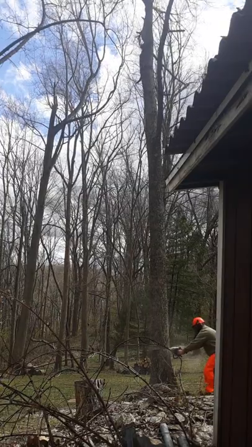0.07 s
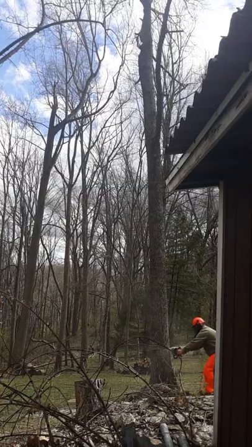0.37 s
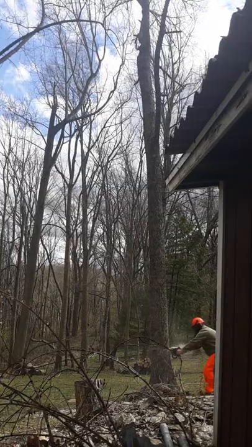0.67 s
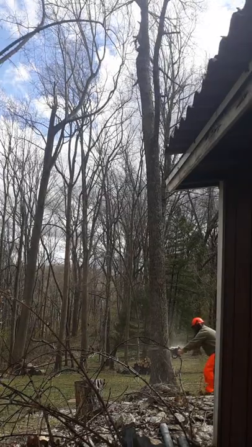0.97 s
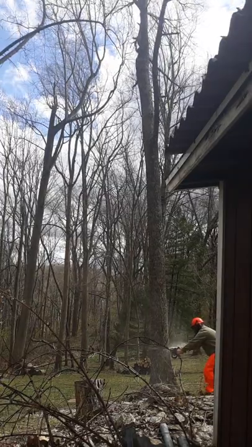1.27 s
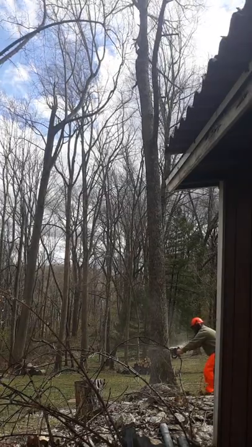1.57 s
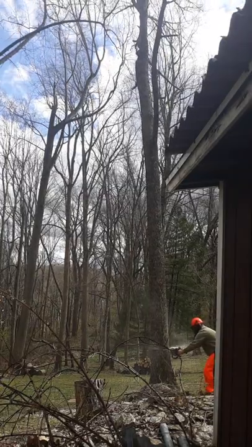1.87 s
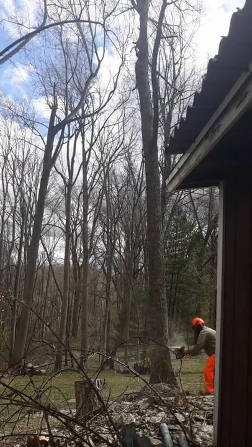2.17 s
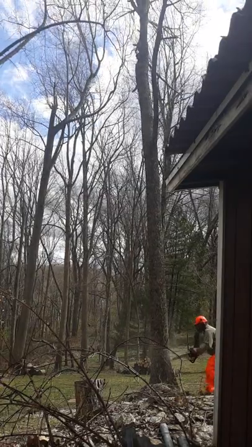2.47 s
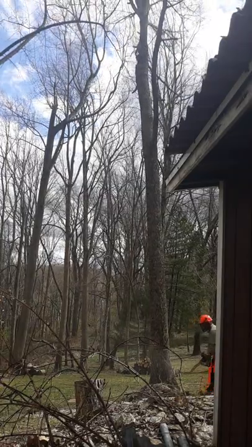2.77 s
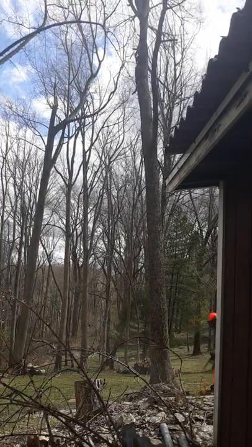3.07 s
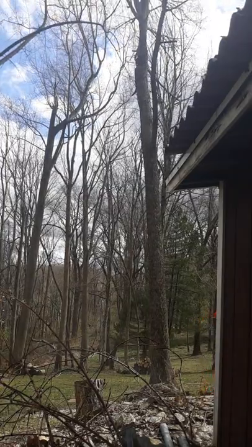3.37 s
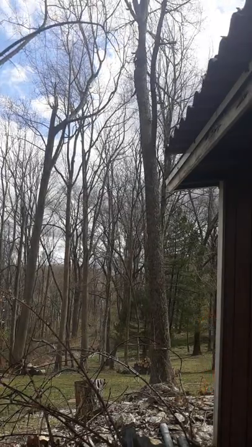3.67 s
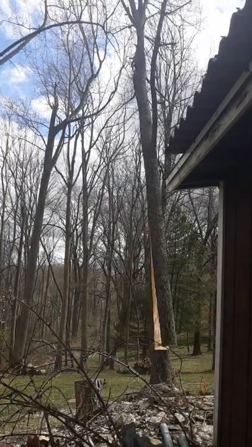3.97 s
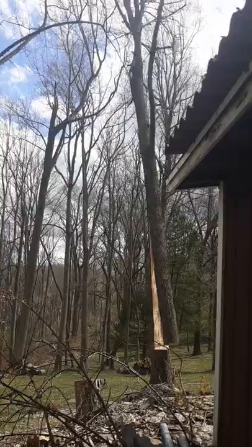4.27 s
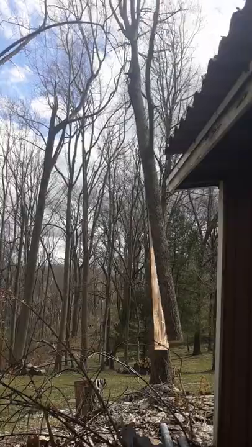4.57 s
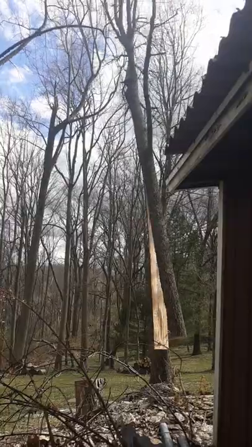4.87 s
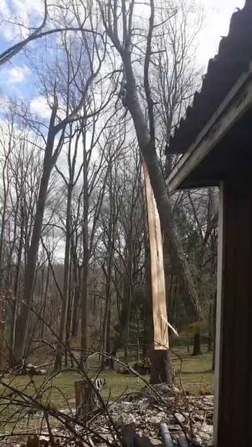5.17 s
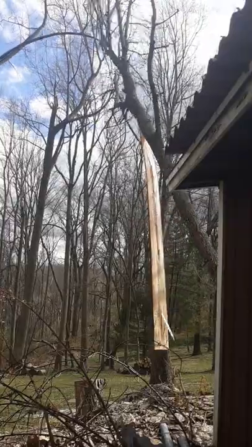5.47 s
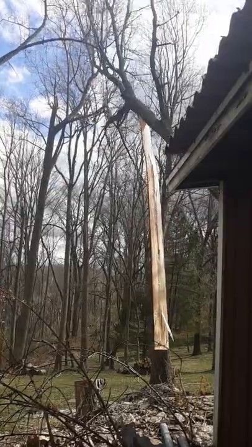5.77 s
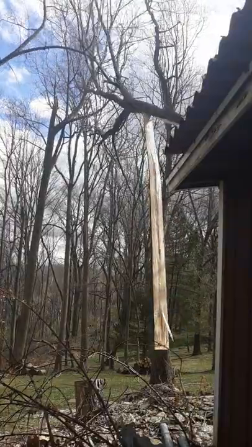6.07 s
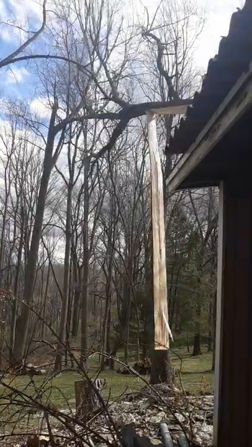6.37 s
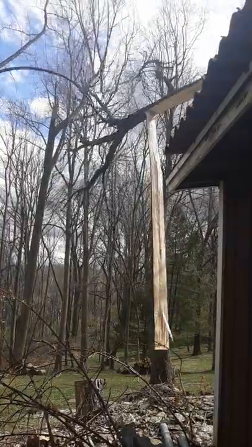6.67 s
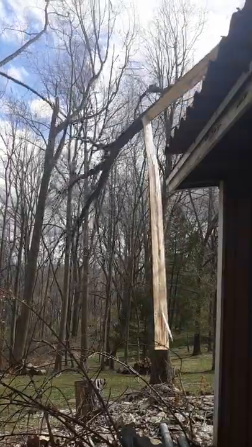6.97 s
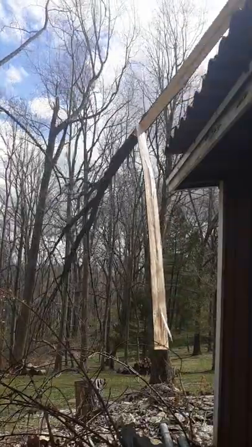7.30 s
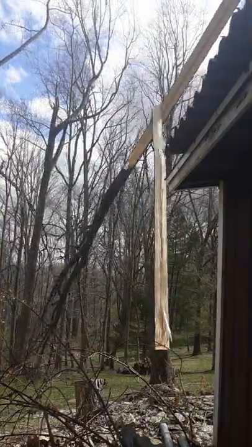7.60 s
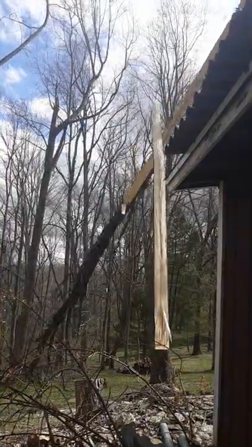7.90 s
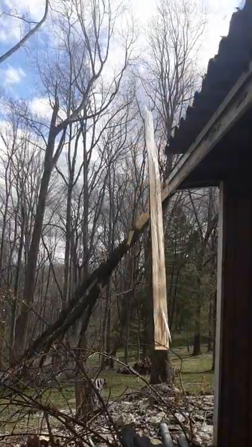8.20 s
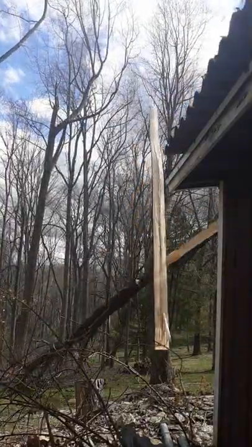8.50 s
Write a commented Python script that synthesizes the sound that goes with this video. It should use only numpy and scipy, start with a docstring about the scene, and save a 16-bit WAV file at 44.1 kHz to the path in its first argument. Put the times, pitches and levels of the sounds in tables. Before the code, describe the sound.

A two-stroke chainsaw labours in a tree trunk, its chain hissing with a few thin squeals. It bogs down, revs up briefly and winds down. The trunk then starts cracking and rips open with a rasping groan. Sharp snaps, dry knocks and creaks follow as the tree tips and crashes through crackling, swishing branches. Everything is heard from some distance, with a short woodland echo over faint air.

```python
"""A tree rips upward with a rasping groan, tearing fibres and loud cracks, creaks as it tips and crashes
through its own branches. Before that, a two-stroke chainsaw labours in the trunk, is pulled out and runs
down: firings pulse the exhaust and ring the muffler, the chain hisses and rubs the bar. Ground and trunks
echo both over faint woodland air. Two microphone ports lie one above the other, so the height of a sound
sets the delay between them."""
import sys
import numpy as np
from scipy import signal
from scipy.fft import rfft, irfft
from scipy.io import wavfile
from scipy.ndimage import map_coordinates

SR = 44100
rng = np.random.default_rng(int(sys.argv[2]) if len(sys.argv) > 2 else 0)


def to_wav(sig):
    """Store sig (one row per channel, or 1-D mono) as 16-bit WAV at the path in sys.argv[1].

    Samples outside -1..1 are clipped; the rate is SR.
    """
    pcm = np.clip(np.atleast_2d(sig), -1, 1) * 32767
    pcm = np.round(pcm).astype(np.int16)
    wavfile.write(sys.argv[1], SR, pcm.T)  # frames by channels


N = 376613
TIME_S = np.arange(N) / SR


def from_db(db):
    """Decibels to gain."""
    return 10 ** (np.asarray(db) / 20)


def unit_rms(x):
    """Scale to unit power."""
    return x / np.sqrt(np.mean(x ** 2) + 1e-20)


def curves(rows):
    """Each column of a timed table at every sample."""
    times_s, *columns = np.transpose(rows)
    return [np.interp(TIME_S, times_s, column) for column in columns]


def drift(knots_per_s):
    """Random wander of unit power."""
    knots = rng.standard_normal(N // 20)
    return unit_rms(np.interp(TIME_S * knots_per_s, np.arange(len(knots)), knots))


def swell(peak_s, attack_s, hold_s, release_s):
    """Gain that grows until peak_s, holds at 1, then dies away."""
    t = TIME_S - peak_s
    log_gain = np.minimum(t, 0) / attack_s - np.maximum(t - hold_s, 0) / release_s
    return np.exp(np.maximum(log_gain, -20))


def add(track, start_s, sound):
    """Mix a sound in at start_s."""
    start = int(start_s * SR)
    track[start:start + len(sound)] += sound[:N - start]


def butter(x, order, edge_hz, kind):
    """Butterworth filter."""
    return signal.sosfilt(signal.butter(order, edge_hz, kind, fs=SR, output="sos"), x)


def colour(x, spectrum, size=4096):
    """Minimum-phase filter from rows of (frequency [Hz], gain [dB])."""
    hz, db = np.transpose(spectrum)
    grid_hz = np.maximum(np.fft.rfftfreq(size, 1 / SR), 1)
    gain = from_db(np.interp(np.log(grid_hz), np.log(hz), db))
    cepstrum = irfft(np.log(gain))
    cepstrum[1:size // 2] *= 2
    cepstrum[size // 2 + 1:] = 0
    return signal.oaconvolve(x, irfft(np.exp(rfft(cepstrum))))[:len(x)]


def resonate(x, hz, width_hz):
    """One resonance with peak gain 1."""
    r = np.exp(-np.pi * width_hz / SR)
    feedback = [1, -2 * r * np.cos(2 * np.pi * hz / SR), r * r]
    return signal.lfilter(np.array([1, 0, -1]) * (1 - r * r) / 2, feedback, x + 1e-18)


# Woodland air: (frequency [Hz], gain [dB])
AIR_SPECTRUM = [(25, -17), (60, -24), (130, -5.5), (300, 4), (700, -3), (1300, -15.5), (3500, -9.5),
                (6500, -22), (8000, -27), (16000, -21)]
def air(shared_db=-48.0, width=0.55):
    """Faint rush of the woods."""
    mid, left, right = [unit_rms(colour(noise, AIR_SPECTRUM)) for noise in rng.standard_normal((3, N))]
    return from_db(shared_db) * (mid + width * np.array([left, right]))


# Echo tone: (frequency [Hz], gain [dB])
ECHO_SPECTRUM = [(80, 5.5), (400, 1), (1500, -0.5), (4000, -2), (8000, -1.5), (16000, 3.5)]
def forest_echo(x, t60_s, near_s, far_db, treble_life, split_hz=1800):
    """Dense echoes from ground and shed, then a long scatter from the trunks, whose treble dies sooner."""
    t = np.arange(65536) / SR
    arrived = t > 0.004
    near = np.exp(-t / near_s) * arrived
    bass_decay = near + from_db(far_db - 60 * t / t60_s) * arrived
    treble_decay = near + from_db(far_db - 60 * t / (t60_s * treble_life)) * arrived
    noise = rng.standard_normal((2, len(t)))
    bass = butter(noise, 2, split_hz, "low") * bass_decay
    treble = butter(noise, 2, split_hz, "high") * treble_decay
    mid, side = (bass - treble) / np.sqrt(np.sum(bass_decay ** 2))
    side = butter(side, 1, 900, "high")   # the ports hear the bass alike
    responses = [colour(mid + sign * side, ECHO_SPECTRUM) for sign in (1, -1)]
    return np.array([signal.fftconvolve(x, response)[:N] for response in responses])


def saw_echo(saw):
    """The trunks scatter back a share of the saw; on open grass it has almost no near echoes."""
    scattered = colour(saw, [(400, -12), (900, -10.5), (2500, -11), (4000, -14), (7000, -10)])
    return forest_echo(scattered, t60_s=0.74, near_s=0.001, far_db=-25.0, treble_life=0.98)


# Height of the action: (time [s], left lag [samples], midrange left minus right [dB])
HEIGHT_CUES = [(0, 6.5, -6), (3.3, 7, -3), (4.25, 4.5, -10), (4.8, 3, -6.5), (5.8, -4.5, -4.5),
               (6.8, -6.5, -5.5), (7.3, 3.5, -5), (7.55, 8.5, -2), (8.54, 8.5, -2.5)]
def ports(x, offset_samples=0):
    """The left port hears a sound later or earlier by its height; the casing shades the upper midrange."""
    lag_samples, pan_db = curves(HEIGHT_CUES)
    midrange = butter(x, 1, [600, 9000], "band")
    left, right = x + midrange * (from_db(np.array([pan_db, -pan_db]) / 2) - 1)
    delayed = map_coordinates(left, [np.arange(N) - lag_samples - offset_samples], order=3)
    return np.array([delayed, right])


def metal_tone(hz, waver, flutter_db):
    """A tone that wavers in pitch and strength."""
    gain = from_db(flutter_db * drift(110))
    cycles = np.cumsum(hz * (1 + waver * drift(400))) / SR
    return gain * np.sin(2 * np.pi * cycles)


def chain_whine(speed_hz, level_db=-28, harmonic=15):
    """The freed chain whirs briefly on its sprocket, falling in pitch as it slows."""
    envelope = swell(peak_s=2, attack_s=0.087, hold_s=0.093, release_s=0.093)
    return from_db(level_db) * envelope * metal_tone(harmonic * speed_hz, waver=0.06, flutter_db=5.0)


# Bar squeals: (time [s], hold [s], level [dB], pitch [Hz], waver [Hz])
BAR_SQUEALS = [(0.377, 0.081, -17, 4620, 9.3), (0.75, 0.091, -21, 4670, 18), (0.97, 0.27, -24, 4580, 14.2),
               (1.09, 0.11, -23, 5330, 45), (2.26, 0.19, -32.5, 2800, 172), (2.648, 0.44, -43.5, 2880, 154)]
def bar_squeals(attack_s=0.012, release_s=0.013):
    """Rubbed by the chain, the guide bar rings in short spells, some pure and some rough."""
    out = np.zeros(N)
    for time_s, hold_s, db, hz, waver_hz in BAR_SQUEALS:
        envelope = from_db(db) * swell(time_s, attack_s, hold_s, release_s)
        out += envelope * metal_tone(hz, waver_hz / hz, flutter_db=1.2)
    return out


# Running chain: (time [s], level [dB])
CHAIN_LEVEL = [(0, -21.5), (1.2, -23.5), (1.6, -26), (2.05, -22), (2.27, -31.5), (2.8, -36.5), (3.1, -43.5),
               (3.5, -38.5), (4.4, -100)]
# Link hiss: (frequency [Hz], gain [dB])
CHAIN_SPECTRUM = [(150, -50), (350, -24), (750, -4), (1200, -11.5), (1650, -6.5), (2100, -7.5),
                  (3400, -2.5), (4800, -2.5), (6500, -2.5), (7800, -15), (9500, -16.5), (11500, -13),
                  (16000, -15.5)]
# Guide bar and clutch drum: (frequency [Hz], width [Hz], gain [dB])
BAR_MODES = [(2660, 170, 2), (3260, 200, 5), (4200, 40, -17)]
# Bar in the cut: (time [s], buried share [0-1])
BAR_BURIED = [(1.75, 1), (1.95, 0)]
# Damping by the cut: (frequency [Hz], gain [dB])
KERF_DAMPING = [(600, 0), (1200, -4), (3200, -5), (4200, 0)]
def chain(flutter_db=1.5):
    """Links hiss along the bar and ring it; while the bar is buried, the wood damps its midrange."""
    level_db, = curves(CHAIN_LEVEL)
    buried = np.clip(curves(BAR_BURIED)[0], 0, 1)
    hiss = colour(rng.standard_normal(N), CHAIN_SPECTRUM)
    ring = sum(from_db(db) * resonate(hiss, hz, width_hz) for hz, width_hz, db in BAR_MODES)
    free = unit_rms(hiss + 1.12 * ring)
    gain = from_db(level_db + flutter_db * drift(150))
    return gain * (buried * colour(free, KERF_DAMPING) + (1 - buried) * free)


THROTTLE_OFF_S = 1.99
FULL_HZ, BOG_HZ, IDLE_HZ = 187, 143.6, 35

# Speed under throttle, sagging as the chain bites: (time [s], firing rate [Hz])
DRIVEN_SPEED = [(0.01, 180), (0.06, 185), (0.145, 179), (0.23, 186), (0.44, 194.3), (0.5, 187.5),
                (0.6, 168), (0.74, 172), (0.85, 172), (0.95, 178), (1.04, 177), (1.11, 186), (1.24, 181.5),
                (1.3, 150), (1.4, 137), (1.46, 133), (1.58, 131), (1.71, 125.3), (1.87, 185.5),
                (1.98, 207.5)]
def engine_speed(coast_s=0.5):
    """Firing rate in Hz: held by the throttle, then coasting to idle."""
    driven_hz, = curves(DRIVEN_SPEED)
    return IDLE_HZ + (driven_hz - IDLE_HZ) * np.exp(-np.maximum(TIME_S - THROTTLE_OFF_S, 0) / coast_s)


def engine_levels(hz, closing_s=0.019, sputter_db=3.5, fade_db_per_s=62, idle_rasp_db=-57):
    """Exhaust note and rasp in dB: both sink with speed; throttle shut, one sputters and one fades."""
    shut_s = np.maximum(TIME_S - THROTTLE_OFF_S, 0)
    throttle = np.maximum(1 - shut_s / closing_s, 0)
    open_note_db = -25 + 37 * np.minimum(np.log2(hz / BOG_HZ), 0)
    open_rasp_db = -11.5 + 6.5 * np.minimum(np.log2(hz / FULL_HZ), 0)
    shut_note_db = -56 + 7.5 * np.log2(hz / IDLE_HZ) + sputter_db * drift(13)
    shut_rasp_db = np.maximum(-21 - fade_db_per_s * shut_s, idle_rasp_db)
    return (throttle * open_note_db + (1 - throttle) * shut_note_db,
            throttle * open_rasp_db + (1 - throttle) * shut_rasp_db)


def firings(cycles, hz):
    """One pulse per turn of the crank, with the same power at every speed."""
    at = np.flatnonzero(np.diff(np.floor(cycles)) > 0)[:-1]
    early = np.clip((cycles[at + 1] % 1) * SR / hz[at], 0, 1)   # a firing falls between two samples
    pulses = np.zeros(N)
    pulses[at], pulses[at + 1] = early, 1 - early
    return unit_rms(pulses * np.sqrt(SR / hz))


# Muffler shell: (frequency [Hz], width [Hz], gain [dB])
SHELL_MODES = [(3820, 394, 7.5), (4145, 280, 7), (4396, 110, 1.5), (4646, 92, 0), (5270, 510, -12.5),
               (6260, 170, -2.5), (6624, 176, -6.5)]
# Upper shell modes: (time [s], gain [dB])
SHELL_TREBLE = [(0, 0), (0.16, 3.5), (0.5, 0.5), (0.9, 1), (1.1, 4), (1.3, -0.5), (1.5, -8.5), (1.72, -2.5),
                (1.95, -1.5), (2.4, 12.5)]
def muffler(blast, treble_above_hz=5000):
    """Blasts of gas ring the muffler shell."""
    treble_db, = curves(SHELL_TREBLE)
    shell = np.zeros(N)
    for k, (hz, width_hz, db) in enumerate(SHELL_MODES):
        gain = from_db(db + treble_db * (hz > treble_above_hz))
        shell += (-1) ** k * gain * resonate(blast, hz, width_hz)
    tone = [(1500, -12), (2900, -3.5), (3700, 2), (6700, 5.5), (7800, 4), (12000, -33)]
    return unit_rms(colour(shell, tone))


# Exhaust note: (frequency [Hz], gain [dB])
EXHAUST_SPECTRUM = [(100, -16.5), (180, -7.5), (260, -0.5), (365, 2), (470, -10.5), (560, 0.5), (710, 8),
                    (900, -3.5), (1080, -3), (1270, -16.5), (1500, -4.5), (1850, -23.5), (2260, -3),
                    (2800, -11), (3300, 1), (4400, -39)]
def engine(hz, wobble=0.0007, ragged_octaves=0.45, scatter_cycles=0.004, uneven_db=0.8, jet_db=-21.0):
    """Each firing sends a pulse and a puff down the exhaust; bogged, it scatters and blows more gas."""
    note_db, rasp_db = engine_levels(hz)
    bogged = np.clip(np.log2(FULL_HZ / hz) / ragged_octaves, 0, 1)
    cycles = np.cumsum(hz * (1 + wobble * drift(60))) / SR
    puffs = 0.22 * unit_rms(np.exp(-9 * (cycles % 1)) * rng.standard_normal(N))
    ragged = firings(cycles + bogged * scatter_cycles * drift(150), hz)
    blast = (ragged + puffs * (1 + 0.9 * bogged)) * from_db(uneven_db * drift(170))
    jet_tone = [(2000, -2), (7000, 12.5), (8500, 9.5), (9600, -1), (11500, 8), (16000, -35)]
    jet = unit_rms(colour(blast + puffs, jet_tone))
    pulses = firings(cycles, hz) * from_db(0.5 * drift(120))
    exhaust = unit_rms(colour(pulses + 0.18 * puffs, EXHAUST_SPECTRUM))
    return from_db(note_db) * exhaust + from_db(rasp_db) * (muffler(blast) + from_db(jet_db) * jet)


# Rip, then creaks: (time [s], length [s], pulse rate [1/s], level [dB], first pitch [Hz],
# last pitch [Hz], ring before the cap [s])
WOOD_CREAKS = [(3.683, 0.023, 170, -24, 775, 610, 0.0047), (3.714, 0.08, 152, -21.5, 307, 408, 0.007),
               (3.76, 0.062, 170, -23, 820, 856, 0.0076), (4.985, 0.24, 49, -38, 522, 560, 0.0077),
               (5.263, 0.068, 44, -42.5, 583, 620, 0.0072), (6.432, 0.27, 25, -43, 520, 423, 0.0036),
               (7.02, 0.3, 68, -35.5, 447, 520, 0.002)]
def wood_creaks(gap_spread=0.15, detune=0.08, spread_db=2.2, ring_cap_s=0.007, attack_s=0.00095):
    """The trunk rips open with a loud rasping groan, then creaks as it tips: pulses on its hollow note."""
    t, out = np.arange(2048) / SR, np.zeros(N)
    for start_s, length_s, per_s, db, first_hz, last_hz, ring_s in WOOD_CREAKS:
        fade = np.exp(-t / min(ring_s, ring_cap_s)) * (1 - np.exp(-t / attack_s))
        gaps, sizes, pitches = rng.standard_normal((3, 64))
        progress = (np.cumsum(np.exp(gap_spread * gaps)) - 0.5) / (per_s * length_s)
        gain = from_db(db + spread_db * sizes) * np.sqrt(2 * SR / per_s / np.sum(fade ** 2))
        hz = (first_hz + (last_hz - first_hz) * progress) * np.exp(detune * pitches)
        for i in np.flatnonzero((progress > 0) & (progress < 1)):
            arch = np.sqrt(np.sin(np.pi * progress[i]))
            pulse = fade * np.sin(2 * np.pi * hz[i] * t)
            add(out, start_s + length_s * progress[i], gain[i] * arch * pulse)
    return butter(out, 4, 270, "high")   # a slender trunk radiates little bass


# Crown sweeping through nearby trees and landing: (time [s], boughs [dB], twigs [dB])
CROWN_FALL = [(5.25, -62, -89), (5.43, -48, -47.5), (5.6, -43, -36), (5.95, -41.5, -40), (6.28, -45, -41.5),
              (6.55, -38.5, -38), (6.95, -41, -44), (7.25, -42, -38.5), (7.72, -39.5, -37),
              (7.87, -30, -30), (8.0, -38.5, -31), (8.24, -34.5, -34), (8.35, -42, -39), (8.54, -43.5, -43)]
# Tearing surges: (time [s], attack [s], hold [s], release [s], body [dB], splintering [dB])
TEAR_SURGES = [(3.31, 0.015, 0.013, 0.054, -36.5, -29), (3.709, 0.035, 0.052, 0.065, -25.5, -20),
               (4.223, 0.001, 0.0025, 0.021, -21, -23), (4.364, 0.047, 0.025, 0.034, -37, -39.5),
               (5.016, 0.15, 0.033, 0.19, -43.5, -46), (5.77, 0.0029, 0.0038, 0.033, -20, -25.5),
               (5.847, 0.0026, 0.013, 0.0069, -23, -28), (6.812, 0.028, 0.013, 0.022, -31, -39),
               (7.349, 0.029, 0.052, 0.0097, -33, -32), (7.533, 0.022, 0.11, 0.04, -33.5, -29.5),
               (8.03, 0.0049, 0.011, 0.02, -31, -32.5)]
def strain():
    """Gains of the thick and the thin fibres giving way: surges on top of the falling crown."""
    power = from_db(curves(CROWN_FALL)) ** 2 * (TIME_S > CROWN_FALL[0][0])
    for time_s, attack_s, hold_s, release_s, body_db, splinter_db in TEAR_SURGES:
        surge = swell(time_s, attack_s, hold_s, release_s)
        power += np.outer(from_db([body_db, splinter_db]), surge) ** 2
    return np.sqrt(power)


def fibre_clicks(per_s, spread_db):
    """Fibres part at random in clicks of very uneven size, with the same power at every rate."""
    sizes = from_db(spread_db * np.minimum(rng.exponential(1, N), 4))
    return sizes * rng.choice([-1, 1], N) * (rng.random(N) < per_s / SR) / np.sqrt(per_s)


# Thick fibres: (frequency [Hz], gain [dB])
GROAN_SPECTRUM = [(60, -27.5), (140, -21.5), (200, -11), (280, -6), (420, 0.5), (600, -0.5), (850, -1.5),
                  (1130, -9), (1550, -5), (2400, -24.5)]
# Thin fibres: (frequency [Hz], gain [dB])
SPLINTER_SPECTRUM = [(120, -37), (400, -25), (1000, -21), (1550, -9.5), (2100, -2.5), (3500, 1.5),
                     (5200, 1), (7000, 0), (7900, -14), (9300, -9), (11500, -5), (16000, -16)]
# Twigs merging into a swish: (time [s], power share [0-1])
SWISH_SHARE = [(7.0, 0), (7.5, 0.45)]
def tearing(thick_gain, thin_gain, usual_strain_db=-35, clump_db=3.6):
    """Fibres tear in clumps, faster and more evenly under high strain; falling twigs swish."""
    load = np.clip(thin_gain / from_db(usual_strain_db), 1, 10)
    clumps = from_db(clump_db / np.sqrt(load) * drift(140))
    groan = unit_rms(colour(fibre_clicks(per_s=1500 * load, spread_db=2.0) * clumps, GROAN_SPECTRUM))
    crackle = unit_rms(colour(fibre_clicks(per_s=1100 * load, spread_db=3.5) * clumps, SPLINTER_SPECTRUM))
    swish = unit_rms(colour(rng.standard_normal(N) * np.sqrt(clumps), SPLINTER_SPECTRUM))
    share = np.clip(curves(SWISH_SHARE)[0], 0, 1)
    thin = np.sqrt(1 - share) * crackle + np.sqrt(share) * swish
    return from_db(0.5) * thick_gain * groan + from_db(2.0) * thin_gain * thin


def twig_ticks(thin_gain, per_s=42, above_db=16.5, spread_db=4.5, cap_db=-16):
    """Single dry fibres and twigs break with short, bright ticks that stand out of the crackle."""
    peak_db = np.minimum(20 * np.log10(thin_gain) + above_db + spread_db * rng.standard_normal(N), cap_db)
    breaks = from_db(peak_db) * rng.choice([-1, 1], N) * (rng.random(N) < per_s / SR)
    tick = butter(colour(signal.unit_impulse(N), SPLINTER_SPECTRUM), 1, 8000, "high")
    return signal.fftconvolve(breaks, tick / np.abs(tick).max())[:N]


# Treble of the breaking wood: (time [s], gain [dB])
WOOD_SHELF = [(3.2, -6), (3.75, -2.5), (4.3, 1.5), (5.1, 7), (5.8, -3.5), (6.9, 0.5), (7.5, 1), (8.5, -14)]
def wood_tone(x, edge_hz=7200):
    """The breaking wood starts dull, is brightest as the tree tips, and dulls on landing."""
    treble_db, = curves(WOOD_SHELF)
    dull = butter(x, 1, edge_hz, "low")
    return dull + from_db(treble_db) * (x - dull)


def fibre_burst(parting_s, tail_s, tail_db):
    """A bundle of fibres parts within milliseconds; a weaker rattle follows."""
    t = np.arange(8192) / SR
    parting = (t / parting_s * np.exp(1 - t / parting_s)) ** 2
    rattle = from_db(tail_db) * np.exp(-t / tail_s) * (1 - np.exp(-t / parting_s))
    return (parting + rattle) * rng.standard_normal(len(t))


def snap(thickness_db, doubling_db=62):
    """A splinter or branch snaps, a thick one slower, fuller and duller than a thin one."""
    tilt = [(1600, 1.28), (2050, 0.6), (3800, 0.6), (6800, 0), (9000, -0.13)]   # Hz, dB per dB
    parting_s = 0.0013 * 2 ** (thickness_db / doubling_db)
    crack = colour(fibre_burst(parting_s, tail_s=0.0044, tail_db=-11), SPLINTER_SPECTRUM)
    crack = colour(crack, [(hz, slope * thickness_db) for hz, slope in tilt])
    return from_db(1.0) * crack / np.abs(crack).max()


def knock(hz, width_hz=330, ring_db=4, upper_hz=1570, upper_db=-8):
    """A slab lets go with a short, dry knock: a thud, its own note and a fainter upper one."""
    blow = fibre_burst(parting_s=0.0022, tail_s=0.012, tail_db=-10.5)
    thud = unit_rms(butter(colour(blow, GROAN_SPECTRUM), 1, 320, "high"))
    ring, upper = [unit_rms(resonate(resonate(blow, f, width_hz), f, f)) for f in (hz, upper_hz)]
    wood = thud + from_db(ring_db) * ring + from_db(upper_db) * upper
    return from_db(-0.5) * wood / np.abs(wood).max()


def small_fractures(thick_gain, thin_gain, count=55, spread_db=5, snap_cap_db=-20, knock_cap_db=-18):
    """Rows of lesser fractures, scattered from the first tear on, their strength following the strain."""
    slots = np.arange(count) + rng.random(count)
    times_s = np.interp(slots, [0, count], [TEAR_SURGES[0][0], TIME_S[-1]])
    at = (times_s * SR).astype(int)
    snaps, knocks, pitches = rng.standard_normal((count, 3)).T
    snap_db = np.minimum(20 * np.log10(thin_gain[at]) - 1 + spread_db * snaps, snap_cap_db)
    knock_db = np.minimum(20 * np.log10(thick_gain[at]) + 13 + spread_db * knocks, knock_cap_db)
    pitch_hz = 655 * np.exp(0.44 * pitches)
    return list(zip(times_s, snap_db, knock_db, pitch_hz))


# Main fractures: (time [s], snap level [dB], knock level [dB], knock pitch [Hz])
MAIN_FRACTURES = [(3.194, -19, -35.5, 646), (3.2465, -16.5, -35, 760), (3.265, -8.5, -30, 656),
                  (3.314, -12, -37, 600), (3.3372, -7, -48, 646), (3.402, -15, -45, 600),
                  (3.559, -35, -49, 600), (3.5842, -14, -29, 663), (3.623, -4, -20, 624),
                  (3.8226, -2, -16.5, 647), (3.8753, 4, -15, 687), (3.885, -19, -10, 650),
                  (3.925, -35, -25, 900), (3.9442, -7, -22.5, 734), (4.044, -35, -58, 620),
                  (4.1794, -30.5, -71, 652), (4.2234, -6.5, -11, 1150), (4.2612, -3, -20.5, 950),
                  (4.2914, -13, -54, 650), (4.344, -13, -31, 520), (4.367, -29, -20.5, 547),
                  (4.3852, -11.5, -26.5, 530), (4.4574, -23.5, -13, 490), (4.4646, -11, -18, 483),
                  (4.4922, -34, -18, 498), (4.546, -25.5, -28, 520), (4.734, -24.5, -32, 604),
                  (4.7827, -26, -28.5, 580), (4.8153, -11, -22.5, 660), (4.8412, -22, -16, 470),
                  (4.868, -19, -18, 475), (4.9324, -16, -28, 536), (4.967, -40, -25, 550),
                  (5.028, -26, -20.5, 540), (5.0522, -22, -53, 600), (5.117, -25.5, -55, 600),
                  (5.225, -36, -31, 552), (5.241, -28, -25.5, 540), (5.2835, -28, -32, 540),
                  (5.5864, -14, -26, 694), (5.724, -10.5, -20, 700), (5.7735, -10, -1.5, 720),
                  (5.7825, -15, -12, 760), (5.796, -6, -13, 830), (5.8445, -2.5, -3, 774),
                  (5.8605, -17, -14, 1000), (5.8965, -22, -11, 690), (5.9512, -22, -13, 780),
                  (5.9785, -15, -12.5, 824), (6.008, -16, -17, 790), (6.0555, -13.5, -16.5, 510),
                  (6.119, -15, -16, 750), (6.163, -11, -20.5, 765), (6.1722, -23, -7, 716),
                  (6.182, -6, -16, 1600), (6.2072, -10.5, -22, 814), (6.2884, -11.5, -24, 830),
                  (6.311, -18, -21, 820), (6.3419, -10, -7, 810), (6.4165, -9, -28, 760),
                  (6.422, -10, -10, 735), (6.497, -27, -16, 774), (6.568, -28, -17, 780),
                  (6.613, -22, -16.5, 791), (6.7, -14, -24, 750), (6.7345, -15.5, -16.5, 697),
                  (6.816, -2.5, -6, 595), (6.822, -21, -14, 840), (7.171, -35, -16, 480),
                  (7.274, -12, -22, 950), (7.556, -12, -11.5, 490), (7.5692, -4, -17, 600),
                  (7.582, -10, -30, 600), (7.608, -6.5, -33, 603), (7.757, -10, -8, 830),
                  (7.7905, -24, -7, 885), (7.799, -5, -9, 665), (7.824, -5.5, -7, 1590),
                  (7.877, -6, -6.5, 1640), (7.886, -12, -13, 705), (8.0375, -6, -2, 536),
                  (8.043, -21, -13, 810), (8.051, -23, -9, 470), (8.169, -8, -8.5, 710),
                  (8.228, -23, -12, 637), (8.241, -12.5, -21, 600), (8.348, -24, -17.5, 635),
                  (8.377, -11, -17, 1110), (8.4047, -7.5, -23, 690)]
def fractures(rows, knock_lead_s=0.002114, usual_knock_db=-25):
    """Each fracture knocks the wood and ends in a snap; the harder the knock, the thicker the wood."""
    out = np.zeros(N)
    for time_s, snap_db, knock_db, hz in rows:
        thickness_db = np.clip(knock_db - usual_knock_db, -26, 10)
        add(out, time_s - knock_lead_s, from_db(knock_db) * knock(hz))
        add(out, time_s, from_db(snap_db) * snap(thickness_db))
    return out


def scene():
    """Saw and tree stand some twenty metres off among bare trunks."""
    speed_hz = engine_speed()
    saw = engine(speed_hz) + chain() + chain_whine(speed_hz) + bar_squeals()
    thick_gain, thin_gain = strain()
    # the split tears along a length of trunk
    lower, upper = [wood_tone(tearing(thick_gain, thin_gain)) for _ in range(2)]
    breaks = fractures(MAIN_FRACTURES) + fractures(small_fractures(thick_gain, thin_gain))
    cracks = wood_tone(breaks) + wood_creaks() + twig_ticks(thin_gain)
    tree = ports(lower + cracks, offset_samples=0.0087) + ports(upper, offset_samples=-2.57)
    saw_with_echo = ports(saw) + saw_echo(saw)
    tree_echo = forest_echo(lower + upper + cracks, t60_s=0.61, near_s=0.0053, far_db=-9, treble_life=0.71)
    return air() + saw_with_echo + from_db(-9.0) * tree_echo + tree


def record(dry, ceiling=1.1, rumble_hz=50, cutoff_hz=16000):
    """Peaks are rounded; rumble and the top are cut."""
    rounded = ceiling * np.tanh(dry / ceiling)
    lowpass = signal.ellip(10, 0.2, 70, cutoff_hz, fs=SR, output="sos")
    return signal.sosfilt(lowpass, butter(rounded, 1, rumble_hz, "high"))


dry = scene()
out = record(dry)
to_wav(out)
```